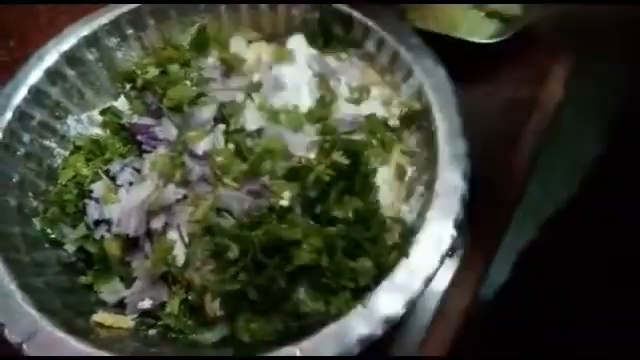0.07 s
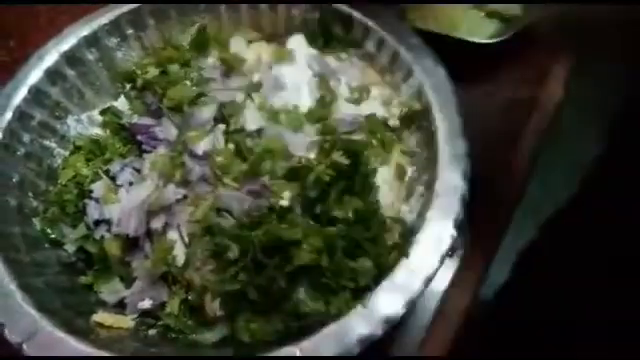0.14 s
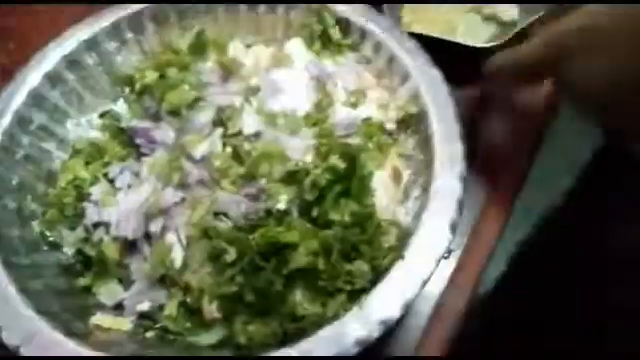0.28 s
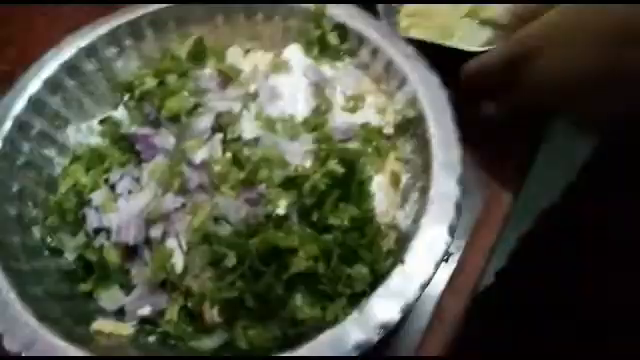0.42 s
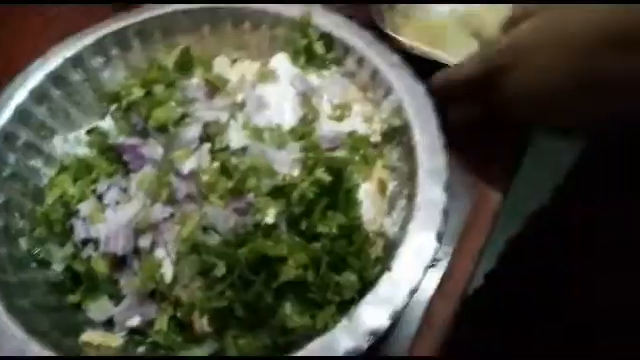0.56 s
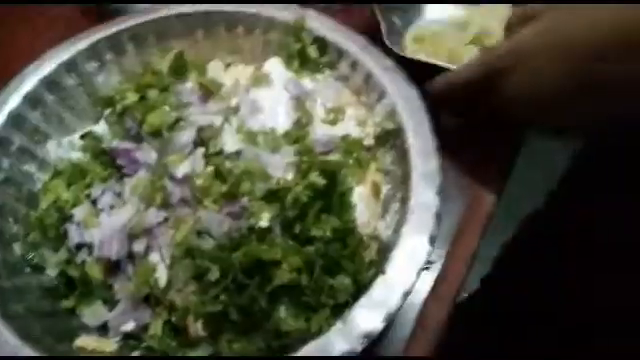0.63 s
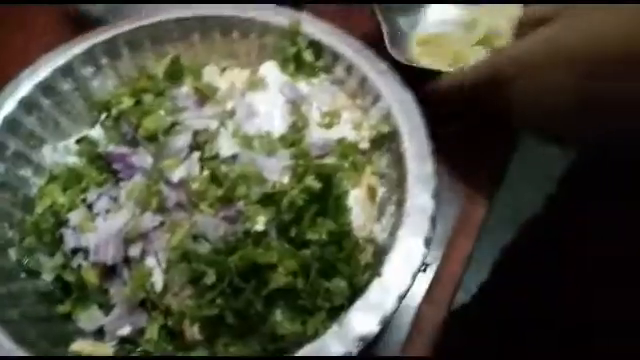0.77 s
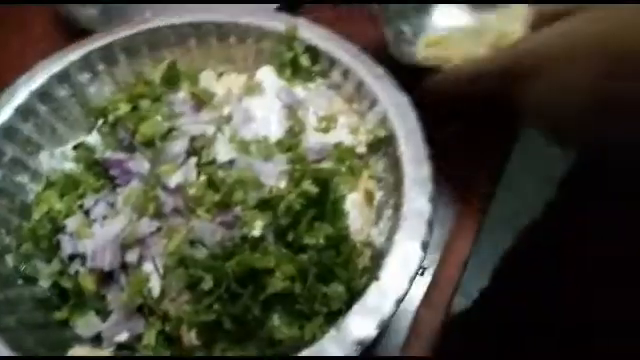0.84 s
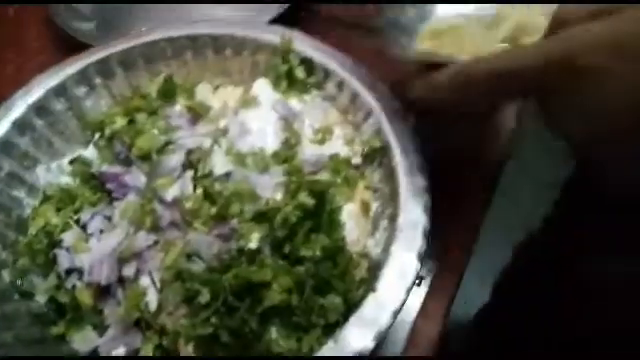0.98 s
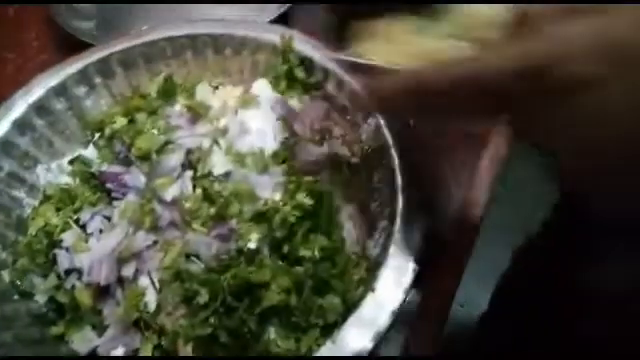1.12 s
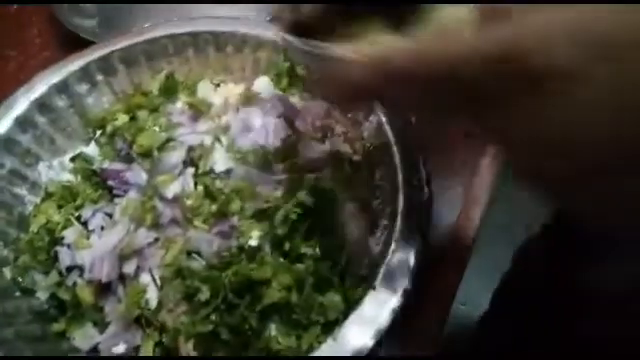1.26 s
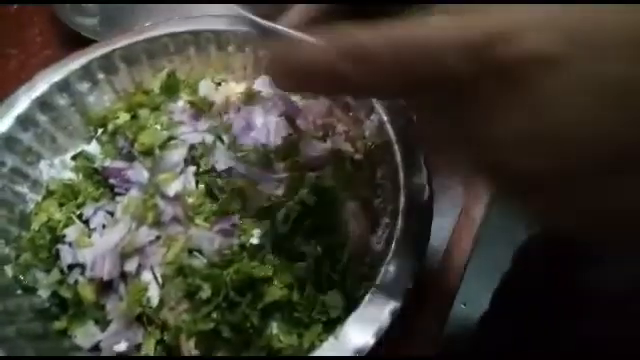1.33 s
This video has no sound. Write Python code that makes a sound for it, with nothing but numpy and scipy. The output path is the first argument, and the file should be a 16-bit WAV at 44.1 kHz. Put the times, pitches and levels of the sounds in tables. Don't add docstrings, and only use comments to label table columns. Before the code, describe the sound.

Steel kitchen vessels clank: a bowl is struck and rings while a cup rattles on its rim, then a damped dish chatters onto the counter, and a tiny clink follows; close phone microphone, small hard-walled room.

```python
import sys
import numpy as np
from scipy import signal
from scipy.io import wavfile

SR = 44100
rng = np.random.default_rng(int(sys.argv[2]) if len(sys.argv) > 2 else 0)


def put_to_file(sound):
    columns = np.atleast_2d(sound).T
    safe = np.clip(columns, -1, 1)
    whole_steps = np.round(safe * 32767)
    wavfile.write(sys.argv[1], SR, whole_steps.astype(np.int16))


def rack_gain(trim_db):
    fader = np.asarray(trim_db, float)
    return 10 ** (fader / 20)


N = 61739

# (time [s], level [dB])
LIP_HITS = [(0.248, -39.5), (.352, -61), (0.397, -58), (0.486, -58.5), (0.524, -48.5), (.545, -59.5),
            (0.594, -61.5), (0.635, -51.5)]
DISH_TIMES = [.633, .6355, .6508, .6532, .6572, .660, .6625, .665, .669, .674]
LANDING_S = DISH_TIMES[4]
TAP_SMEAR_S = 1e-5


def read(table, hz):
    table_hz, value = np.array(table).T
    return np.interp(np.log(hz), np.log(table_hz), value)


def decay(t, t60):
    return np.exp(-np.log(1000) * t / t60)


def band(lo_hz, hi_hz):
    sos = signal.butter(2, [lo_hz, hi_hz], "bandpass", fs=SR, output="sos")
    x = signal.sosfilt(sos, rng.standard_normal(N))
    return x / np.std(x)


def highpass(x, hz):
    return signal.sosfilt(signal.butter(4, hz, "highpass", fs=SR, output="sos"), x)


def ring(modes, seconds=0.49, wobble_db=0, rise_s=0.0003):
    hz, db, t60 = np.array(modes, float).T[:, :, None]
    t = np.arange(int(seconds * SR)) / SR
    if wobble_db:
        turns_per_s = 59
        knots = np.arange(0, 1, 1 / 60)
        turns = rng.standard_normal((len(hz), 60))
        sway = np.array([np.interp(t * turns_per_s / 60, knots, turn) for turn in turns])
        db = db + wobble_db * sway * np.minimum(t / 0.032, 1)
    tones = rack_gain(db) * decay(t, np.maximum(t60, 0.004)) * np.sin(2 * np.pi * hz * t)
    return np.sum(tones, axis=0) * (1 - np.exp(-t / rise_s))


def skin(colour, t60s, count=400):
    place, life, strength = rng.random((3, count))
    hz = 120 + 15500 * ((np.arange(count) + place) / count) ** 1.6
    spacing_db = 10 * np.log10(np.gradient(hz) + 1)
    t60 = read(t60s, hz) * (0.6 + 0.8 * life)
    db = read(colour, hz) + spacing_db - 10 * np.log10(t60) + 8 * strength
    out = ring(np.c_[hz, db, t60], seconds=0.3, rise_s=0.0001)
    return out / np.max(np.abs(out))


def contacts(times, dbs, smear_s):
    push, k = np.zeros(N), np.arange(400)
    shapes = rng.standard_normal((len(times), 400)) * np.exp(-k / (smear_s * SR))
    for s, db, shape in zip(times, dbs, shapes):
        push[int(s * SR) + k] += rack_gain(db) * shape / np.sqrt(np.sum(shape ** 2))
    return push


def strike(times, dbs, body, smear_s=0.002):
    return signal.fftconvolve(contacts(times, dbs, smear_s), body)[:N]


def land(body):
    return signal.fftconvolve(np.arange(N) == int(LANDING_S * SR), body)[:N]


def air():
    # (frequency [Hz], density [dB per Hz])
    air_colour = [(25, -41), (70, 3), (270, -10.5), (335, -8), (695, -11.5), (2410, -19.5), (7500, -23.5),
                  (11000, -41.5), (16000, -51)]
    t, hiss = np.arange(N) / SR, 0
    for hz in 30 * 2 ** np.arange(0, 9.1, 0.5):
        flicker = np.interp(t, np.linspace(0, t[-1], 30), rng.standard_normal(30))
        level = rack_gain(read(air_colour, hz) + 1.5 * flicker)
        hiss = hiss + level * np.sqrt(hz) * band(hz / 1.9, hz * 1.3)
    whine = rack_gain(-88) * band(8825, 8975)
    shake = np.clip((t - 0.245) / 0.01, 0, 1) * np.clip((0.43 - t) / 0.042, 0, 1)
    thud = rack_gain(-57.5) * shake * band(25, 175)
    far_tick = strike([0.011], [-59], ring([(1555, 0, 0.093)], seconds=0.086, rise_s=0.003))
    return rack_gain(-68) * hiss / np.std(hiss) + whine + thud + far_tick


def room(x):
    # (frequency [Hz], t60 [s])
    room_t60 = [(150, 0.26), (300, 0.64), (800, 0.6), (1500, 0.59), (2500, 0.61), (5000, 0.43),
                (9000, 0.28), (15000, 0.051)]
    room_db, build_s = -12, 0.002
    t, tail = np.arange(N) / SR, 0
    for hz in 80 * 2 ** np.arange(0, 7.7, 1 / 3):
        noise = np.sqrt(hz) * band(hz / 1.153, hz * 1.12)
        tail = tail + noise * decay(t, read(room_t60, hz))
    tail = tail * (1 - np.exp(-t / build_s))
    return rack_gain(room_db) * signal.fftconvolve(x, tail / np.sqrt(np.sum(tail ** 2)))[:N]


def boom():
    modes = [(hz, -55.5, 0.8) for hz in (105, 128.3, 139)]
    return land(ring(modes, seconds=0.2, wobble_db=3.5, rise_s=0.04))


def after_ring():
    tray_hz = [1625, 1685, 1760]
    t = np.arange(N) / SR - LANDING_S
    tray = ring([(hz, -52.5, 0.85) for hz in tray_hz], seconds=0.34, wobble_db=6.5, rise_s=0.086)
    flutter = band(9500, 13500) * (t > 0) * decay(np.maximum(t, 0), 0.25)
    return strike([LANDING_S], [0], tray, TAP_SMEAR_S) + rack_gain(-46.5) * flutter


def belly():
    modes = [(hz, -28, 0.11) for hz in (200, 387, 492, 560)]
    return land(ring(modes, seconds=0.2, rise_s=0.0074))


def clink():
    # (time [s], level [dB])
    clinks = [(1.1322, -47.5)]
    clink_hz = [1500, 1680, 3020, 3140, 3280, 4340, 4480, 4650, 4900]
    # (level [dB], t60 [s])
    clink_modes = [(-16.5, .03), (-8, .046), (-2, .04), (-1.5, .035), (0, .03), (3, .04), (0, .025),
                   (-1, .025), (-3, .025)]
    body = ring(np.c_[clink_hz, clink_modes], seconds=0.1, rise_s=0.0016)
    return strike(*np.array(clinks).T, body, TAP_SMEAR_S)


def dish():
    hits_db = np.array([-24, -22, -5, -2, 1.5, -9, -7, -3, -7, -14])
    dish_hz = [707, 1010, 1254, 2073, 2466, 2620, 3634, 4091, 4511, 4800, 5250, 6024, 7321]
    # (level [dB], t60 [s])
    dish_modes = [(-11, 0.052), (-10.5, 0.1), (-6, 0.076), (-8.5, 0.051), (-20, 0.14), (1, 0.021),
                  (-9.5, 0.09), (-22.5, 0.035), (-24.5, 0.117), (-26, 0.031), (-20.5, 0.14), (0, 0.012),
                  (-5.5, 0.016)]
    # (frequency [Hz], level [dB])
    dish_skin = [(59, -46), (100, -40), (1250, 6), (1830, -6.5), (2040, -19.5), (2270, -10), (4670, 14),
                 (14400, -22.5), (16000, -38.5)]
    # (frequency [Hz], t60 [s])
    dish_skin_t60 = [(100, 0.29), (1000, 0.046), (5000, 0.019), (15000, 0.068)]
    counter_hz = [170, 528]
    # (level [dB], t60 [s])
    counter_modes = [(-44, 0.4), (-42, 0.7)]
    ring_db = -16.5
    spread = (np.arange(36) + rng.random(36)) / 36
    tray = [(1280 + 1050 * (u - 0.5), -45.5, 0.54 + 0.56 * u) for u in spread]
    body = ring(np.c_[dish_hz, dish_modes], seconds=0.33)
    counter = ring(np.c_[counter_hz, counter_modes], seconds=0.46, wobble_db=6.5, rise_s=0.0099)
    return (strike(DISH_TIMES, hits_db + ring_db, body)
            + strike(DISH_TIMES, hits_db, skin(dish_skin, dish_skin_t60), smear_s=0.0051)
            + strike(DISH_TIMES, hits_db + ring_db, ring(tray, seconds=0.7, wobble_db=9))
            + strike([LANDING_S], [0], counter, TAP_SMEAR_S))


def rattle():
    # (time [s], level [dB])
    pressure = [(.26, -38.5), (0.329, -50.5), (0.401, -46), (0.462, -64), (0.499, -57.5), (.525, -51.5),
                (.55, -57.5), (0.602, -55.5), (0.645, -53.5)]
    knocks_per_s, scatter_db = 1500, 3
    t, (s, db) = np.arange(N) / SR, np.array(pressure).T
    knock = (rng.random(N) < knocks_per_s / SR) * rng.choice([-1, 1], N)
    knock = knock * rack_gain(scatter_db * rng.standard_normal(N))
    return knock * rack_gain(np.interp(t, s, db, left=-200, right=-200))


def haze():
    hz = 8800 + 6800 * (np.arange(70) + rng.random(70)) / 70
    db = -21 - 1.6 * (hz - hz[0]) / 1000
    body = ring(np.c_[hz, db, np.full(70, 0.072)], seconds=0.25)
    shimmer = signal.fftconvolve(rattle(), body)[:N]
    return strike(*np.array(LIP_HITS).T, body, smear_s=0.003) + rack_gain(-18) * shimmer


def clang():
    clang_hz = [385, 1000, 2500, 2750, 3300, 3550, 4750, 5050]
    # (level [dB], t60 [s])
    clang_modes = [(2, 0.093), (1.5, 0.041), (0, 0.03), (10.5, 0.019), (3, 0.081), (3.5, 0.043), (11, .06),
                   (3.5, 0.079)]
    body = ring(np.c_[clang_hz, clang_modes], seconds=0.15, rise_s=0.0004)
    return strike([0.2479], [-23], body, TAP_SMEAR_S)


def scuff():
    # (time [s], level [dB])
    scuffs = [(0.522, -31.5), (0.53, -28.5), (0.534, -45), (0.602, -41)]
    # (frequency [Hz], level [dB], t60 [s])
    scuff_modes = [(1481, 11.5, 0.011), (1565, -6.5, 0.15), (1900, -4, 0.022), (2703, -6, 0.011),
                   (2980, 5, 0.025), (3774, -4, 0.025), (4700, -6.5, 0.057)]
    body = ring(scuff_modes, seconds=0.1, rise_s=0.0016)
    return strike(*np.array(scuffs).T, body, smear_s=0.0035)


def bowl():
    # (time [s], bowl [dB], rim [dB], cup [dB], crack of the wall [dB])
    bowl_hits = [
        (0.2343, -59.5, -61, -42, -61.5),
        (0.2476, -18.5, -15, -4.5, -1),
        (.2500, -43.5, -26.5, -19.5, -6),
        (0.2532, -41, -31, -20, -2),
    ]
    bowl_hz = [367, 495, 548, 654, 703, 732, 949, 1001, 1294, 1605, 1660, 2026, 2066, 2100]
    # (level [dB], t60 [s])
    bowl_modes = [(-22.5, 1.5), (-21.5, 2.4), (-12.5, 0.88), (-3.5, 0.68), (1.5, 1.2), (-6, 0.95),
                  (-16.5, 0.94), (1, 0.088), (-11.5, 0.7), (-17, 1.2), (-7.5, 0.23), (-28, 1.4), (-17.5, 1),
                  (-22, 1.4)]
    rim_hz = [2469, 2514, 2589, 2875, 3284, 3677, 4124, 4490, 4755, 4982, 5057, 5308, 5586]
    # (level [dB], t60 [s])
    rim_modes = [(-9, 0.15), (-24, 0.53), (-18.5, 0.13), (-24.5, .35), (-15, 0.27), (-19, 0.34),
                 (-28.5, 0.45), (-23, .5), (-9, 0.1), (-9, 0.31), (-31, 0.47), (-12, 0.3), (-9.5, 0.18)]
    cup_hz = [6530, 6702, 7100, 7504, 7946, 8382, 8705]
    # (level [dB], t60 [s])
    cup_modes = [(-24.5, 0.46), (-20, 0.14), (-25.5, 0.14), (-24, 0.15), (-25, 0.14), (-37.5, 0.099),
                 (-27.5, 0.07)]
    lip_hz = [9679, 10240, 10420, 11100, 11600, 11950, 12740, 13500, 15100]
    # (level [dB], t60 [s])
    lip_modes = [(-8, .1), (0.5, 0.053), (-8, 0.12), (-12.5, 0.24), (-10, 0.12), (-10.5, 0.06), (-10, .12),
                 (-15, .06), (-18, 0.06)]
    # (frequency [Hz], level [dB])
    bowl_skin = [(59, -65), (100, -42.5), (662, -20.5), (836, -15), (970, -3.5), (3540, 1.5), (3940, -3),
                 (4980, 3), (16000, -54)]
    # (frequency [Hz], t60 [s])
    bowl_skin_t60 = [(100, 0.2), (1000, 0.18), (5000, 0.085), (15000, .06)]
    t = np.arange(N) / SR
    s, bowl_db, rim_db, cup_db, crack_db = np.array(bowl_hits).T

    modes = np.c_[bowl_hz, bowl_modes]
    touched = (modes[:, 0] > 400) & (modes[:, 0] < 800)
    finger = rack_gain(-12 * np.clip((t - 0.395) / 0.035, 0, 1))
    dulled = finger * strike(s, bowl_db, ring(modes[touched], wobble_db=2.9), TAP_SMEAR_S)
    free = strike(s, bowl_db, ring(modes[~touched], wobble_db=7.5), TAP_SMEAR_S)

    rim = ring(np.c_[rim_hz, rim_modes], wobble_db=11)
    cup = ring(np.c_[cup_hz, cup_modes], wobble_db=11)
    lip = ring(np.c_[lip_hz, lip_modes], wobble_db=11)
    wall = skin(bowl_skin, bowl_skin_t60)
    blows = (dulled + free + scuff()
             + strike(s, rim_db, rim, TAP_SMEAR_S)
             + strike(s, cup_db, cup)
             + strike(s, crack_db, wall, smear_s=0.00084)
             + strike(*np.array(LIP_HITS).T, lip, smear_s=0.0018))

    buzz = rack_gain(-7.5) * rim + rack_gain(1.5) * cup + rack_gain(-23.5) * lip
    dull_wall = signal.sosfilt(signal.butter(4, 7000, fs=SR, output="sos"), wall)
    buzz[:len(wall)] += rack_gain(19) * dull_wall
    hand = decay(np.maximum(t - 0.65, 0), 0.034)
    return (blows + signal.fftconvolve(rattle(), buzz)[:N]) * hand


def scene():
    near = bowl() + clang()
    far = dish() + clink() + belly()
    steel = near + far + room(rack_gain(0.5) * near + far)
    heard = highpass(steel + haze() + after_ring(), 140)
    floor = highpass(air(), 45)
    return (heard + floor + boom())[None, :]


def top_cut(x):
    return signal.sosfilt(signal.butter(12, 16670, fs=SR, output="sos"), x)


def record(dry):
    softness = 0.3
    rounded = np.tanh(dry * softness) / softness
    mix = signal.sosfilt(signal.ellip(6, 0.2, 30, 15600, fs=SR, output="sos"), rounded)
    return top_cut(mix)


dry = scene()
out = record(dry)
put_to_file(out)
```